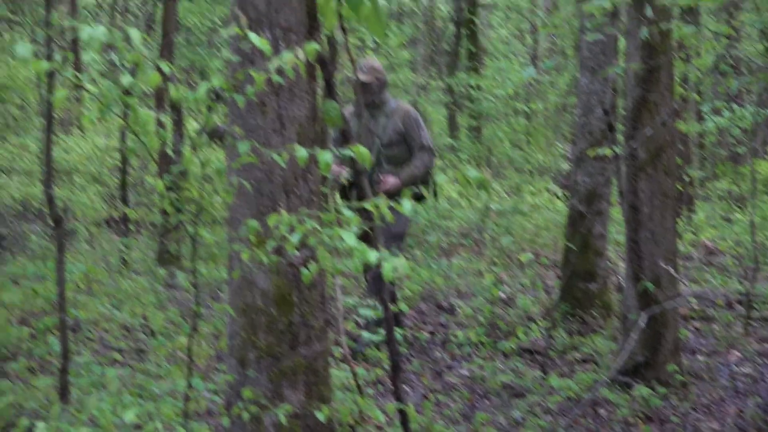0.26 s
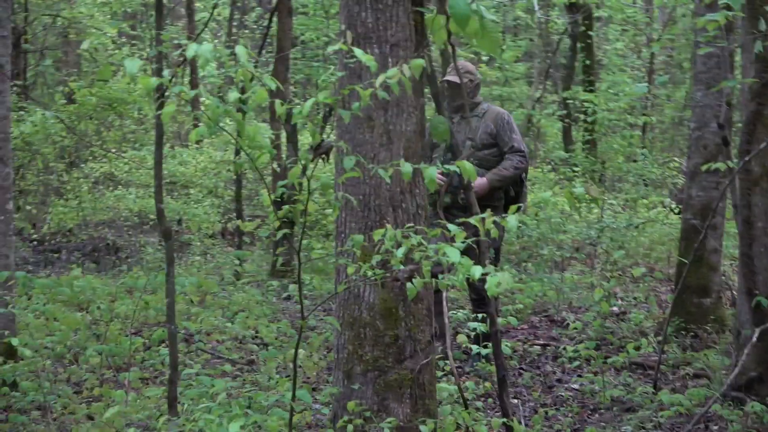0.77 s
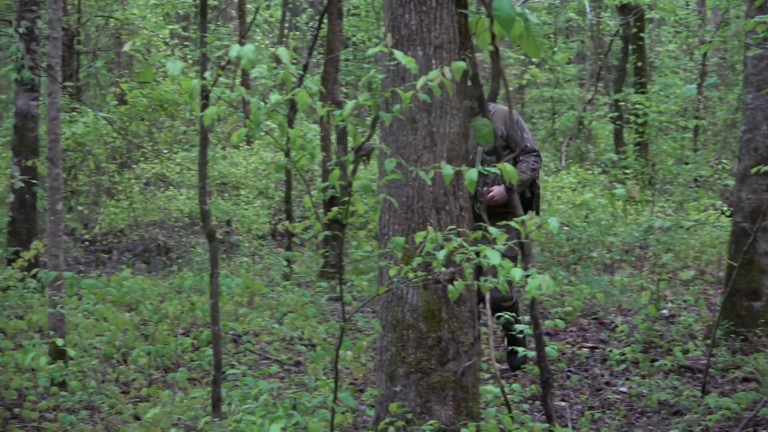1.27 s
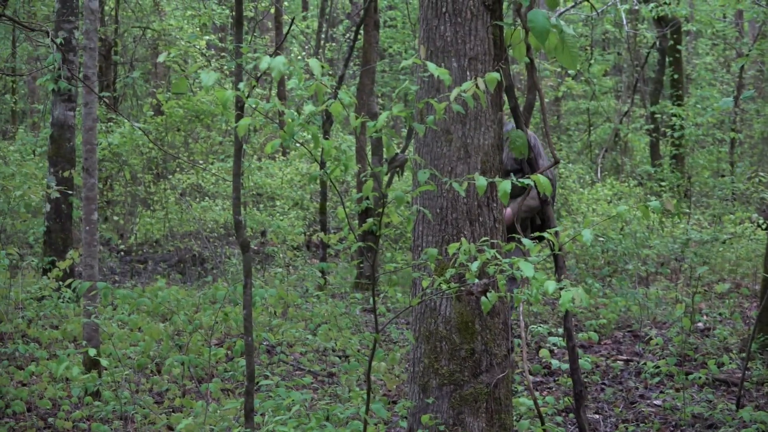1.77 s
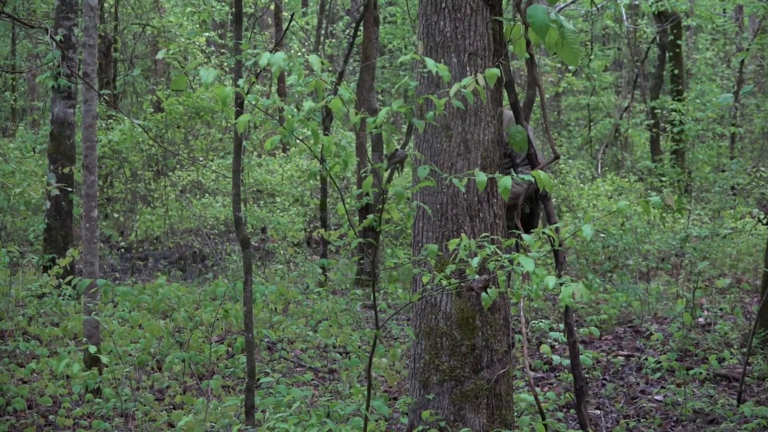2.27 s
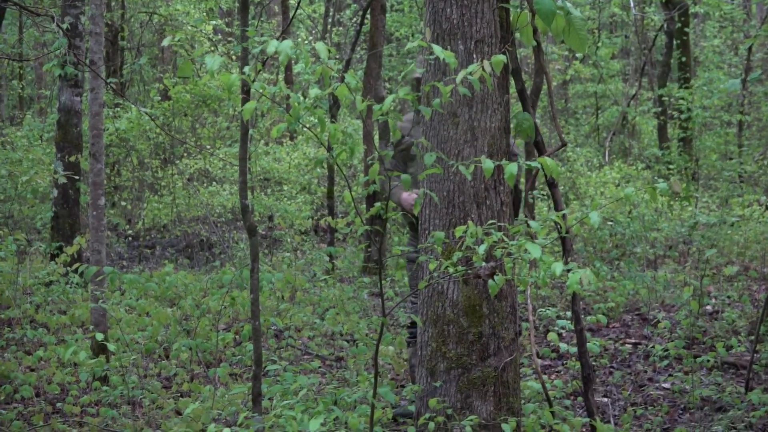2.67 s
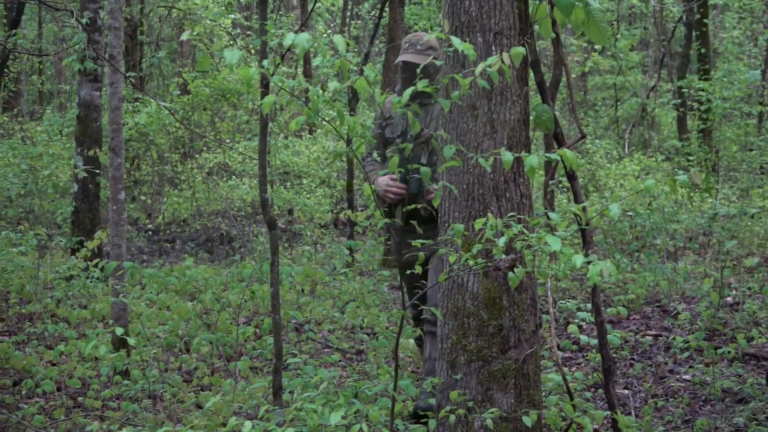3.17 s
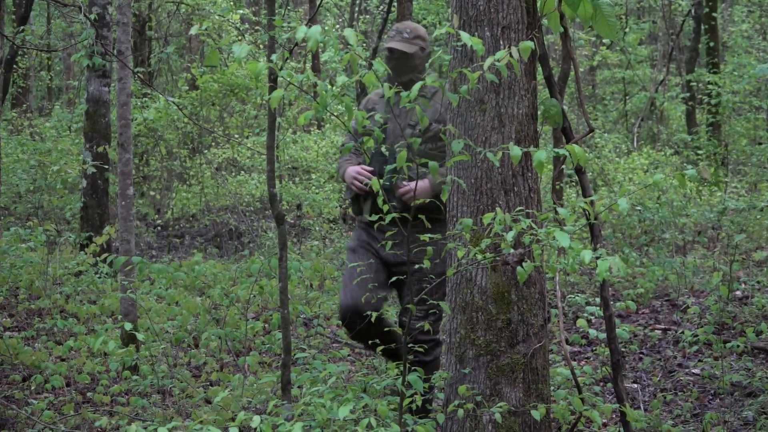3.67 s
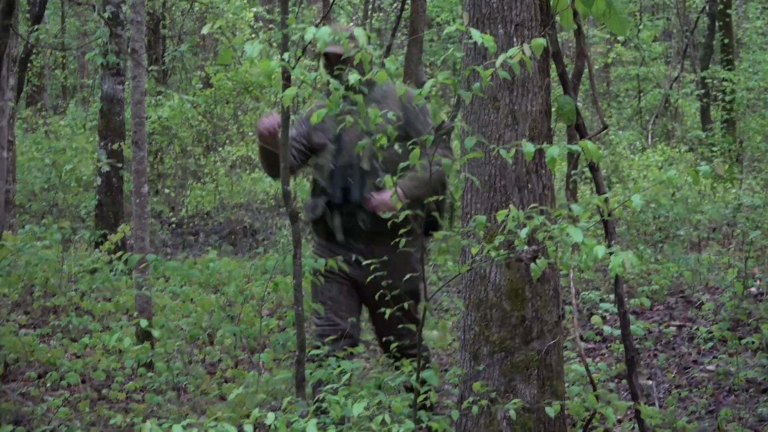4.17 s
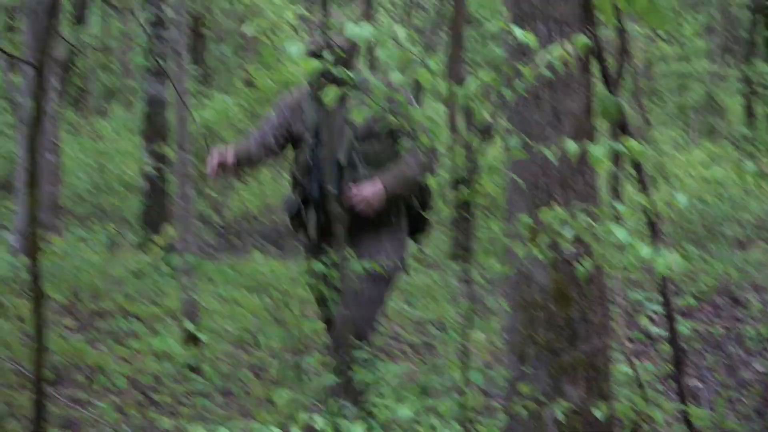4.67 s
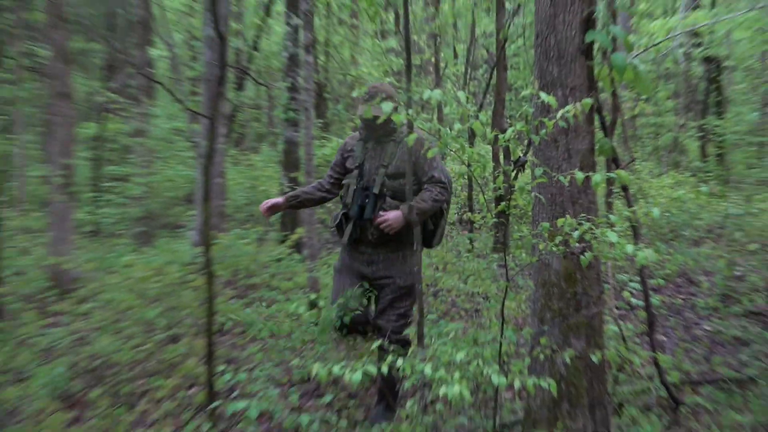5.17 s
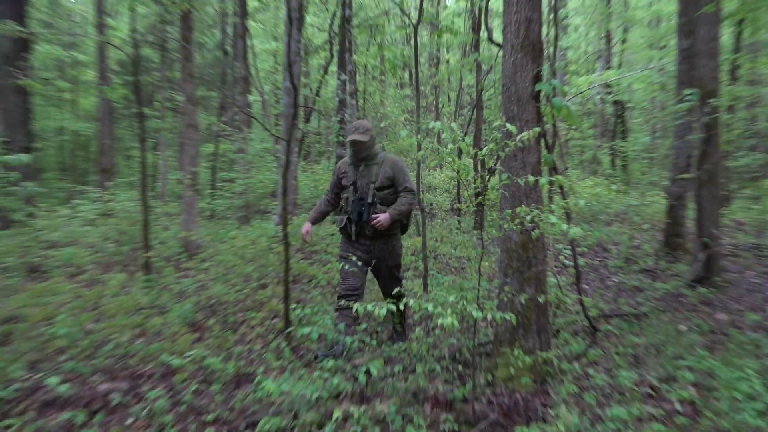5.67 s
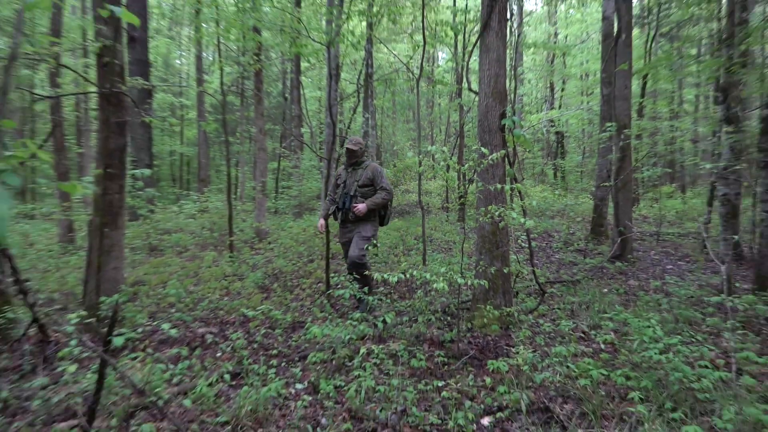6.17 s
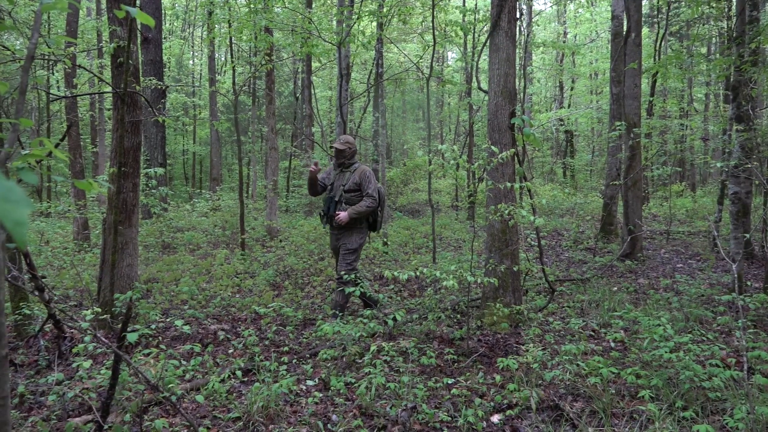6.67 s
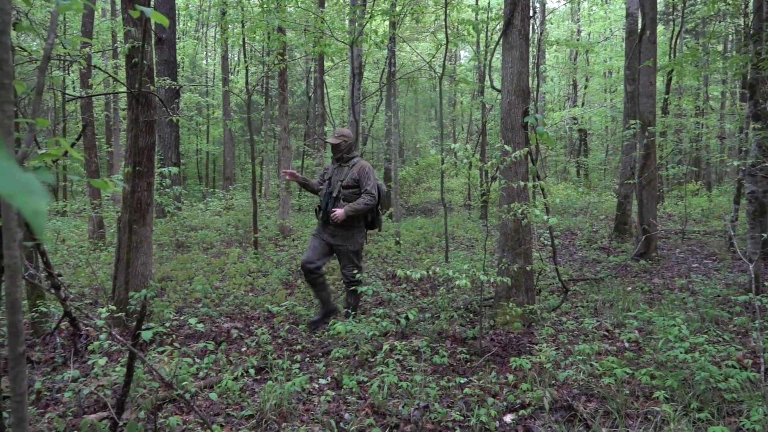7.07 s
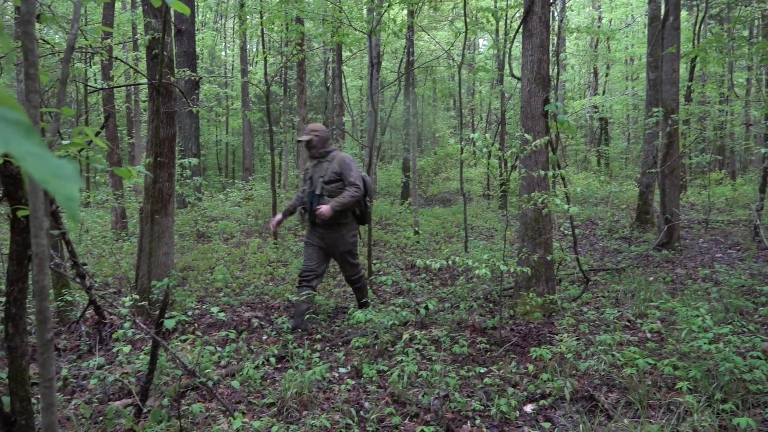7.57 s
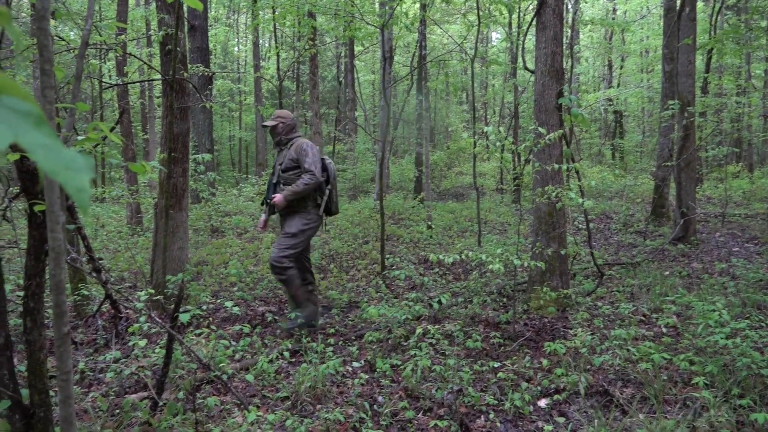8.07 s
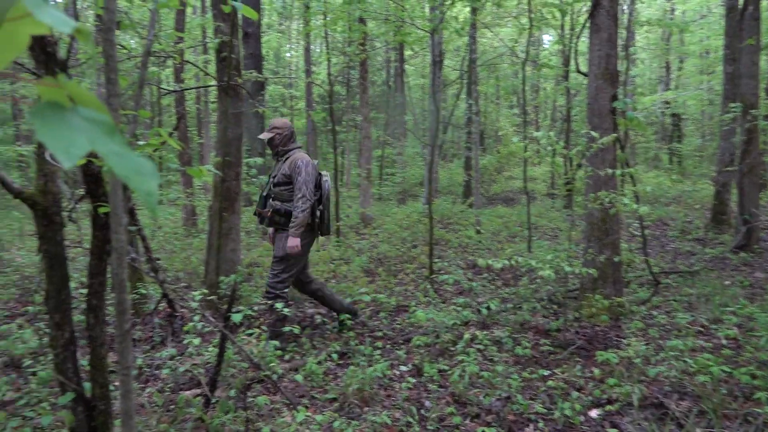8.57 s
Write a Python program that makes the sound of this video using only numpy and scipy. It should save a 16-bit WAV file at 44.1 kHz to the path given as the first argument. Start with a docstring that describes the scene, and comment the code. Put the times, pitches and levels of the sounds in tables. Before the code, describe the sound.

Boots crunch and brush through damp leaf litter in a wood, twigs snapping sharply, over a low handling rumble and a brief far-off bird.

```python
"""A wood with damp leaf litter: a walker's boots crunch and brush through leaves, twigs snap, a far bird sings twice.
Crunches are crowds of tiny noise puffs, snaps are noise cracks with ringing tones, the bird is a gliding tone.
A hand-held camera trembles about eleven times a second, which its microphone picks up as a huge, very low wave.
The grip rumbles as filtered noise, the zoom motor hums as plain tones for a while, and the wood hushes softly."""
import sys
import numpy as np
from scipy import signal
from scipy.fft import rfft, irfft, next_fast_len
from scipy.io import wavfile
from scipy.ndimage import uniform_filter1d, map_coordinates

SR = 44100
rng = np.random.default_rng(int(sys.argv[2]) if len(sys.argv) > 2 else 0)


def output_pcm(signal):
    """Save a mono or channel-first signal as 16-bit PCM at the path in sys.argv[1].

    Samples are clipped to [-1, 1] before scaling.
    """
    pcm = np.clip(np.atleast_2d(signal).T, -1, 1) * 32767
    wavfile.write(sys.argv[1], SR, np.round(pcm).astype(np.int16))


N = 388521  # length of the scene in samples

# a boot landing in, pushing through or lifting out of the leaves; the sign of the fade is ignored:
# (time of peak [s], leaves before mixing [dB], packed litter [dB], time to fade by 60 dB [s])
SCUFFS = [(0.305, -44, -46, 0.5), (0.395, -40.5, -41.5, 0.5), (0.55, -42, -38.5, 0.14), (0.7, -73, -48, -1),
          (1.075, -49.5, -44, 2.4), (1.86, -52, -49, 1.5), (2.1, -49, -44.5, 1), (2.26, -46, -58, .5),
          (2.37, -44.5, -46.5, 1.16), (2.63, -51, -42.5, 3.5), (3.459, -42.5, -41, 0.5),
          (3.59, -44, -40, 0.6), (3.778, -37.5, -42.5, 0.3), (3.86, -37, -47.5, 0.5),
          (3.95, -41.5, -46, 2.5), (4.14, -42.5, -38.5, 0.7), (4.34, -37.5, -46.5, 0.5),
          (4.55, -35, -42, 0.6), (4.74, -40, -37.5, 2), (4.92, -41, -37.5, 2.5), (5.1, -45, -43.5, 4),
          (5.25, -40.5, -61, 3.5), (5.374, -30, -31, 0.47), (5.511, -28, -37, 0.5), (5.55, -42.5, -46, 2.5),
          (5.719, -36.5, -33, 1.06), (5.765, -48, -34.5, 1.05), (6.538, -40, -59, 1.5),
          (6.74, -45, -46, 3.5), (6.86, -39.5, -46, 0.14), (7.19, -50.5, -58, 3.5),
          (7.56, -34.5, -35.5, 0.8), (7.77, -40.5, -36, 1), (7.87, -38.5, -40, 0.3),
          (8.065, -31.5, -41, 0.57), (8.105, -31, -38.5, 0.43), (8.175, -32.5, -44, 0.17),
          (8.24, -39, -58, 0.5), (8.41, -41.5, -54, 0.5), (8.475, -31.5, -37, 0.5), (8.57, -42, -36, 1.7)]
LEAF_RISE_S, LITTER_RISE_S = 0.16, 0.38  # time to rise by 60 dB
CRUMPLE_DB, FIZZ_DB, FLAKE_DB = -1.24, -11, -7  # mix of the three leaf sounds
# tone of crumpling leaves: (frequency [Hz], relative level [dB])
LEAF_TONE = [(700, -10), (1500, -9), (2200, -9), (3100, -4.5), (4300, -8.5), (5200, -4), (6800, -29.5),
             (9000, -37.5)]
# tone of the fine fizz of crumpling leaves: (frequency [Hz], relative level [dB])
FIZZ_TONE = [(4500, -12), (6800, -4), (12000, -3.5), (15500, -15)]
# tone of the packed litter underfoot: (frequency [Hz], relative level [dB])
LITTER_TONE = [(120, -3.5), (250, -2.5), (450, -1), (900, -1.5), (1400, -3.5), (2200, -13), (4200, -13),
               (6000, -62)]
FLAKE_COUNT, FLAKE_HZ, FLAKE_SCATTER = 2200, 3900, 0.27  # scatter of the natural log of pitch
FLAKE_CYCLES, FLAKE_SPREAD_DB = 2.4, 3.5  # cycles until a click falls to 1/e; spread of click sizes
# twig and stem snaps: (time [s], crack before mixing [dB], thock relative to the snap's level [dB],
# knock relative to it [dB], middle pitch of thock [Hz], middle pitch of knock [Hz])
SNAPS = [(0.088, -20.5, -8, -16, 430, 1730), (0.223, -22, -21.5, -11, 550, 5570),
         (0.376, -12.5, -18, -9, 430, 1170), (0.532, -28, -4, -3, 550, 1940),
         (0.547, -21, 7.5, 3, 645, 990), (0.791, -24.5, 1.5, 4, 1430, 2280),
         (1.064, -18, -6, -27, 620, 2280), (1.298, -35.5, 6.5, 14.5, 620, 1500),
         (2.051, -33, 11.5, 14.5, 295, 480), (2.333, -26, 5.5, 7.5, 375, 890),
         (2.42, -32.5, 10.5, -23.5, 450, 1340), (2.839, -28.5, 7, 8, 660, 2130),
         (3.573, -16, -8, -4, 590, 3230), (3.935, -15.5, -13, -31, 570, 3510),
         (3.9814, -25, -6, 6, 480, 1590), (3.9851, -19, -7, 0.5, 605, 1340),
         (4.315, -19.5, -20, -6.5, 660, 3160), (4.653, -9, -32, -12, 623, 2900),
         (4.97, -25, -18, 3.5, 600, 3870), (5.232, -12, -27.5, -24.5, 630, 2700),
         (5.315, -20.5, -16, -1.5, 590, 1030), (5.369, -19, 2, 3, 400, 1300),
         (5.407, -24.5, -4, 7, 705, 1100), (5.486, -12.5, 0.5, 7, 410, 1020), (5.519, -18, 3, 5, 380, 930),
         (5.694, -5, -3.5, -1.5, 700, 1670), (5.734, -21, 11.5, -10, 527, 1400),
         (5.84, -31, -4, 5, 730, 1090), (5.945, -24.5, 8, 8, 500, 1580), (6.053, -14, -12, -25, 750, 2680),
         (6.138, -28, 5.5, -2, 490, 1720), (6.26, -34.5, -13, 11.5, 620, 1060),
         (6.654, -14, -12, -26, 440, 3320), (6.737, -9, -34, -37, 440, 2780),
         (7.023, -17, -16, -32, 610, 2840), (7.464, -20.5, -13, 2, 564, 3660),
         (7.548, -15.5, -11, -2.5, 820, 1290), (7.596, -7, -16, -27, 460, 3390),
         (7.765, -16, -29, -21, 460, 3070), (8.052, -13, -10, -28, 576, 2280),
         (8.089, -10.5, -9, -23, 550, 1740), (8.147, -14.5, -15, 1.5, 320, 3100),
         (8.161, -13.5, -9, -2.5, 343, 2800), (8.308, -19.5, -4.5, -21, 496, 2700),
         (8.336, -17, -25.5, -17, 520, 3590), (8.35, -17.5, -23.5, -20, 507, 2810),
         (8.373, -15, -26, -17, 530, 2540)]
# thock, then knock, of a snapping twig: (time to fade by 60 dB [s], scatter of log pitch [no unit])
TWIG_RINGS = [(0.011, .05), (0.009, .03)]
# crisp ticks of single dry leaves: (time [s], peak level [dB], pitch [Hz])
TICKS = [(2.4877, -25, 2280), (3.108, -28.5, 4570), (3.9395, -23, 4800), (4.4787, -30, 7000),
         (4.735, -31, 8600), (5.344, -28, 9700), (5.369, -19, 11000), (5.494, -15.5, 9200),
         (5.860, -23, 13000), (6.184, -28, 3580), (6.655, -23.5, 8950), (6.889, -23, 11700),
         (7.007, -35, 3500), (7.077, -31, 4760), (7.102, -27, 3570), (7.136, -33, 3200), (7.168, -29, 5200),
         (7.301, -38, 3500), (7.597, -23, 7500), (7.9633, -29, 5500), (8.2843, -30, 8000),
         (8.337, -21.5, 13500), (8.4397, -27, 11000)]
# far bird, a list of points for each phrase: (time [s], middle pitch [Hz], middle level [dB])
BIRD_PHRASES = [
    [(3.012, 2900, -59), (3.022, 2800, -44), (3.042, 2380, -45), (3.07, 2850, -41), (3.095, 2850, -41),
     (3.108, 2500, -44), (3.125, 2150, -44), (3.155, 2550, -45), (3.17, 2600, -61)],
    [(3.184, 4400, -50), (3.193, 4100, -45), (3.202, 3400, -41), (3.215, 2850, -39), (3.228, 2450, -45),
     (3.255, 3200, -51), (3.27, 3300, -61)],
    [(5.8, 2850, -51), (5.878, 2850, -54), (5.89, 2800, -40), (5.925, 2760, -47), (5.955, 3050, -44),
     (5.974, 2450, -43), (6.0, 2300, -44), (6.006, 3130, -54), (6.018, 3130, -45), (6.05, 2950, -55)],
]
# hand tremor in the microphone: (time [s], level [dB])
TREMOR = [(0.0, -10), (0.1, -6.5), (0.37, -24), (0.66, -6.5), (1.33, -13), (1.52, -35.5), (1.64, -10),
          (2.89, -16), (2.97, -31), (3.19, -8), (3.46, -6.5), (3.61, -18.5), (3.93, -6), (4.83, -13.5),
          (4.91, -6.5), (5.49, -8), (5.69, -20), (5.81, -6), (6.89, -11.5), (6.97, -28), (7.07, -13),
          (8.27, -9.5), (8.81, -16)]
# jolts of the hand on the camera body: (time of peak [s], rumble level [dB])
JOLTS = [(0.52, -26.5), (0.7, -19.5), (2.03, -30.5), (3.97, -22.5), (4.26, -22), (4.78, -21.5), (4.92, -18),
         (5.08, -20.5), (5.49, -29), (5.72, -25), (6.21, -30), (6.98, -27.5), (7.49, -27), (7.86, -36),
         (8.17, -30)]
GRIP_DB, JOLT_RISE_S, JOLT_FADE_S = -31.5, 0.58, 0.44  # steady grip; time to rise and to fade by 60 dB
# tone of the steady grip: (frequency [Hz], relative level [dB])
GRIP_TONE = [(19, 9.5), (30, 5.5), (45, 0), (70, -10), (130, -16.5), (300, -49.5)]
# tone of the jolts: (frequency [Hz], relative level [dB])
JOLT_TONE = [(19, 7.5), (30, 10), (45, 2), (70, -7), (130, -12.5), (300, -22.5), (600, -79)]
# zoom motor: (start [s], end [s], pitch [Hz], middle level [dB])
ZOOM = [(4.828, 4.97, 122, -29), (4.985, 6.246, 178.6, -43), (6.182, 6.35, 119.8, -31)]
# echo among the trunks, before stretching: (frequency [Hz], time to fade by 60 dB [s])
TREE_ECHO = [(300, .25), (3000, .3), (10000, .12)]
# tone of the hush of the wood: (frequency [Hz], relative level [dB])
WOOD_TONE = [(35, -40), (76, -16.5), (164, -15), (621, -15), (3580, -29), (4420, -33), (5090, -30.5),
             (7230, -43), (13300, -48), (16000, -57)]
TOP_HZ = 16000


def amp(db):
    """Turn a level in dB into a gain."""
    return 10 ** (np.asarray(db) / 20)


def unit(x):
    """Scale x to an average strength (rms) of 1."""
    return x / np.sqrt(np.mean(x ** 2) + 1e-20)


def along(points, hz):
    """Read a value at each frequency by joining the points on a log axis."""
    point_hz, values = np.transpose(points)
    return np.interp(np.log(hz + 1), np.log(point_hz + 1), values)


def curves(rows):
    """Join the rows into one value per sample for each column after the time."""
    s, *columns = np.transpose(rows)
    return [np.interp(np.arange(N) / SR, s, column) for column in columns]


def wobble(rate):
    """A smooth random curve around zero, with rate random points a second."""
    points = rng.standard_normal(int(N * rate / SR) + 4)
    return map_coordinates(points, [np.arange(N) * rate / SR])


def filtered(x, response):
    """Multiply each frequency of x by the gain that response gives for it."""
    size = next_fast_len(N + SR // 2)
    gain = response(np.fft.rfftfreq(size, 1 / SR))
    return irfft(rfft(x, size) * gain, size)[..., :N]


def coloured(x, tone):
    """Give x the tone of a table, at an rms of 1."""
    return unit(filtered(x, lambda hz: amp(along(tone, hz))))


def swells(s, db, rise_s, fade_s):
    """Gain of overlapping events that each rise to a peak and fade; their powers add."""
    step = 64  # samples between computed points
    late = np.arange(0, N + step, step)[:, None] / SR - s
    drop_db = 60 * np.where(late < 0, -late / rise_s, late / np.abs(fade_s))
    power = amp(2 * (db - drop_db)).sum(axis=1)
    return np.sqrt(np.interp(np.arange(N), np.arange(len(power)) * step, power))


def crackle(share, spread_db, clump_db, clump_rate, life):
    """Tiny unequal breaks in clumps: noise puffs start hard, and their power falls to 1/e in life seconds."""
    sizes = amp(spread_db * np.minimum(rng.exponential(size=N), 5.5))
    breaks = sizes * (rng.random(N) < share)  # share is the chance of a break at each sample
    power = signal.lfilter([1], [1, -np.exp(-1 / (life * SR))], breaks ** 2)
    clumps = amp(clump_db * wobble(clump_rate))
    return np.sqrt(power) * clumps * rng.standard_normal(N)


def boots():
    """Leaves crumple with a crackle and a finer fizz; packed litter gives a duller crunch under the weight."""
    s, leaves_db, litter_db, fade_s = np.transpose(SCUFFS)
    breaks = crackle(share=0.025, spread_db=3.0, clump_db=1.5, clump_rate=60, life=0.0017)
    splinters = crackle(share=0.0015, spread_db=3.5, clump_db=1.0, clump_rate=50, life=0.00046)
    crunches = crackle(share=0.02, spread_db=4, clump_db=2.0, clump_rate=25, life=0.0023)
    crumple = coloured(breaks, LEAF_TONE)
    fizz = coloured(unit(breaks) + 0.35 * unit(splinters), FIZZ_TONE)
    litter = coloured(crunches, LITTER_TONE)
    leaves = amp(CRUMPLE_DB) * crumple + amp(FIZZ_DB) * fizz + amp(FLAKE_DB) * flakes()
    brushing = swells(s, leaves_db, LEAF_RISE_S, fade_s) * leaves
    pressing = swells(s, litter_db, LITTER_RISE_S, fade_s) * litter
    return brushing + pressing


def flakes():
    """Single leaves flex and click at random times, each at a pitch of its own for a few cycles."""
    pitch = rng.standard_normal(size=(FLAKE_COUNT, 1))
    hz = FLAKE_HZ * np.exp(FLAKE_SCATTER * np.clip(pitch, -2, 2))
    t = np.arange(256) / SR
    sizes = amp(FLAKE_SPREAD_DB * np.minimum(rng.exponential(size=pitch.shape), 4))
    clicks = sizes * np.exp(-t * hz / FLAKE_CYCLES) * np.sin(2 * np.pi * hz * t)
    at = rng.integers(N, size=pitch.shape) + np.arange(len(t))
    return unit(np.bincount(at.ravel(), clicks.ravel(), minlength=N)[:N])


def snaps():
    """Each snap is a dry crack and a weaker after-break; both set off the twig's two ringing tones."""
    rings, cracks = np.zeros(N + SR), np.zeros(N + SR)
    t = np.arange(SR // 20) / SR
    fray = amp(-60 * t / 0.0036) + 0.25 * amp(-60 * t / 0.052)  # a hard edge, then fibres tearing
    chances = rng.standard_normal((len(SNAPS), 4))
    for (s, crack_db, *modes), chance in zip(SNAPS, chances):
        ring = np.zeros(len(t))
        for (t60, scatter), db, middle_hz, draw in zip(TWIG_RINGS, modes[:2], modes[2:], chance):
            hz = middle_hz * np.exp(scatter * np.tanh(draw))
            ring += amp(db - 60 * t / t60) * np.sin(2 * np.pi * hz * t)
        start = round((s + 0.0018) * SR)
        again = start + round((0.00162 + 0.00065 * np.tanh(chance[2])) * SR)
        again_db = crack_db - 12.0 + 3 * np.tanh(chance[3])
        for at, db in ((start, crack_db), (again, again_db)):
            crack = 0.6 * fray * rng.standard_normal(len(t)) + 3.15 * (t == 0)  # noise and one sharp click
            rings[at:][:len(t)] += amp(db) * ring
            cracks[at:][:len(t)] += amp(db) * crack

    def crack_tone(hz):
        """The tones of leaf and fizz added together."""
        return amp(along(LEAF_TONE, hz) + 6.0) + amp(along(FIZZ_TONE, hz) - 14.0)

    return rings[:N] + filtered(cracks[:N], crack_tone)


def ticks():
    """A dry leaf breaks with a very short tick of noise, in a broad band around its own pitch."""
    out = np.zeros(N + SR)
    t = np.arange(SR // 50) / SR
    fade = amp(-60 * t / 0.0049) + 0.11 * amp(-60 * t / 0.058)  # a quick fade with a faint, slower tail
    noises = rng.standard_normal((len(TICKS), len(t)))
    for (s, db, hz), noise in zip(TICKS, noises):
        band = signal.butter(2, [hz / 1.6, min(hz * 1.6, 0.45 * SR)], "band", fs=SR)
        tick = signal.lfilter(*band, noise * fade)
        out[round((s + 0.0012) * SR):][:len(t)] += amp(db) * tick / np.abs(tick).max()
    return out[:N]


def bird():
    """A gliding whistle, silent between phrases; moving leaves make level and pitch flutter."""
    t = np.arange(N) / SR
    out = np.zeros(N)
    for phrase in BIRD_PHRASES:
        hz, db = curves(phrase)
        singing = (t > phrase[0][0]) & (t < phrase[-1][0])
        level = amp(db + 1.5 * wobble(150))
        turns = np.cumsum(hz + 50 * wobble(200)) / SR
        out += singing * level * np.sin(2 * np.pi * turns)
    return out


def tremor():
    """The trembling hand swings the microphone, which turns the swings into a very low wave."""
    swing_hz = 11.2 + 0.786 * wobble(4.0)  # the hand never keeps an even beat
    level = amp(uniform_filter1d(curves(TREMOR)[0], size=2001))
    return np.sqrt(2) * level * np.sin(2 * np.pi * np.cumsum(swing_hz) / SR)


def grip():
    """The hand rumbles steadily on the camera body, with stronger jolts: low, uneven noise."""
    lumps = amp(2 * wobble(25)) * rng.standard_normal(N)
    steady = amp(GRIP_DB) * coloured(lumps, GRIP_TONE)
    jolt_lumps = amp(2.8 * wobble(30)) * rng.standard_normal(N)
    jolts = swells(*np.transpose(JOLTS), JOLT_RISE_S, JOLT_FADE_S) * coloured(jolt_lumps, JOLT_TONE)
    return steady + jolts


def zoom_motor():
    """The zoom motor hums through the camera body: one slightly unsteady tone for each run."""
    t = np.arange(N) / SR
    out = np.zeros(N)
    for start, end, hz, db in ZOOM:
        running = np.clip(np.minimum(t - start, end - t) / 0.04, 0, 1)  # 40 ms to fade in and out
        level = amp(db + 0.8 * wobble(12))
        out += running * level * np.sin(2 * np.pi * hz * t + 0.26 * wobble(6.7))
    return out


def trees(x, longer):
    """Trunks scatter the sound back; each frequency dies at its own speed, longer stretches them all."""
    hz, t, noise = signal.stft(rng.standard_normal(SR // 2), SR, nperseg=256)
    t60 = longer * along(TREE_ECHO, hz)[:, None]
    tail = signal.istft(noise * amp(-60 * t / t60), SR, nperseg=256)[1]
    delayed = np.pad(x, (300, 0))  # the echo comes 300 samples late
    return signal.fftconvolve(delayed, tail / np.linalg.norm(tail))[:N]


def wood():
    """The lasting hush of the wood: soft noise whose level drifts a little."""
    return amp(-45.0 + 1.8 * wobble(3.26)) * coloured(rng.standard_normal(N), WOOD_TONE)


def scene():
    """Walker and bird among the trees, heard by the shaking camera."""
    steps, twigs, song = boots(), snaps() + ticks(), bird()
    near_echo = trees(amp(-14.5) * steps + amp(-19.5) * twigs, longer=0.73)
    far_echo = trees(amp(-1.5) * song, longer=2.1)
    camera = tremor() + grip() + zoom_motor()
    return (steps + twigs + song + camera + near_echo + far_echo + wood())[None]


def record(dry):
    """The camera keeps nothing above its band limit."""
    return filtered(dry, lambda hz: hz < TOP_HZ)


dry = scene()
out = record(dry)
output_pcm(out)
```